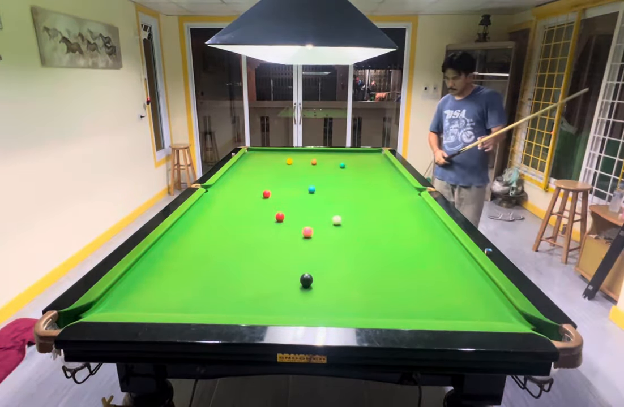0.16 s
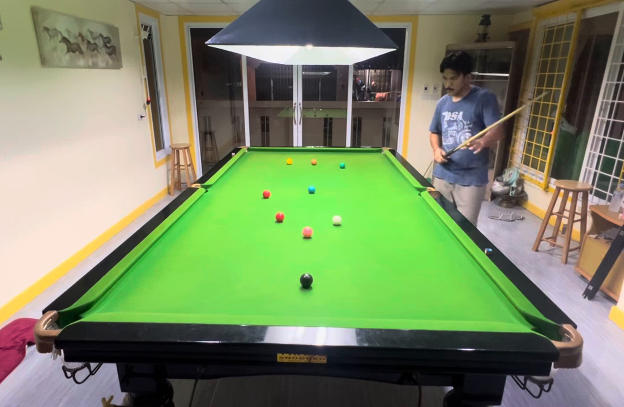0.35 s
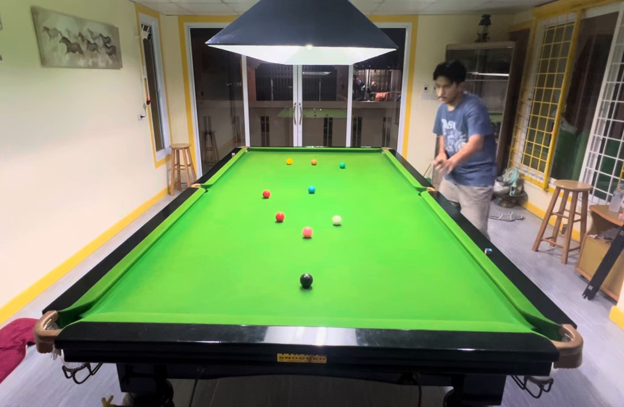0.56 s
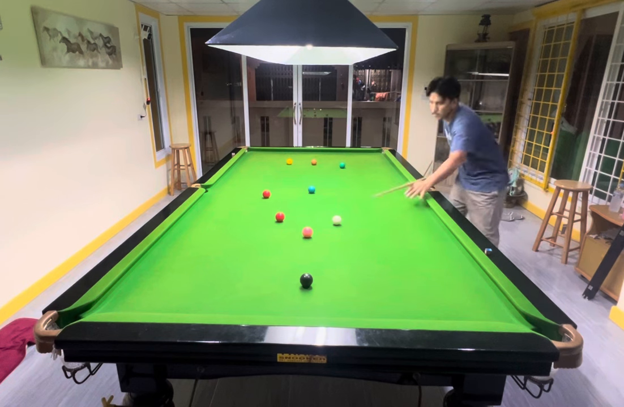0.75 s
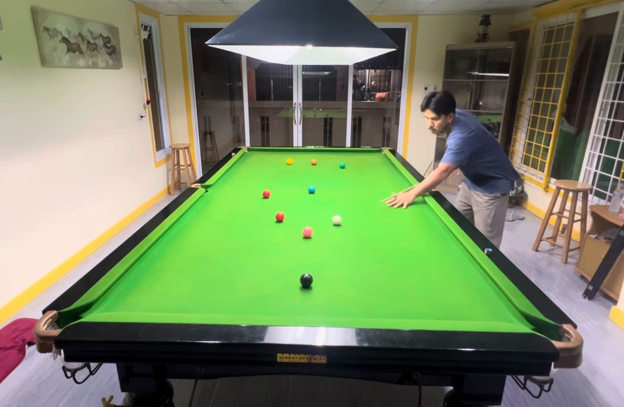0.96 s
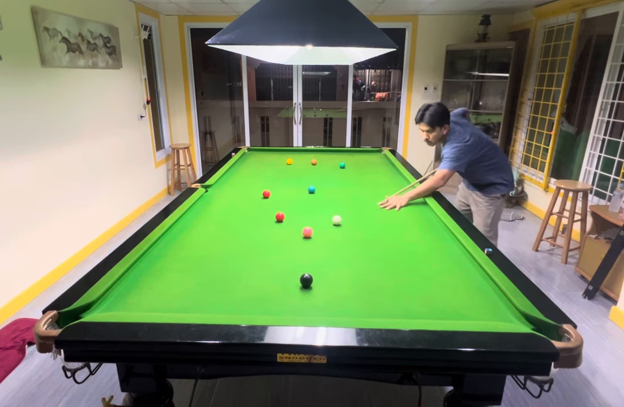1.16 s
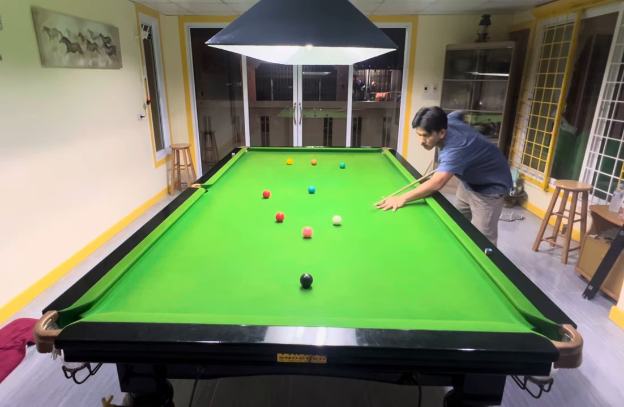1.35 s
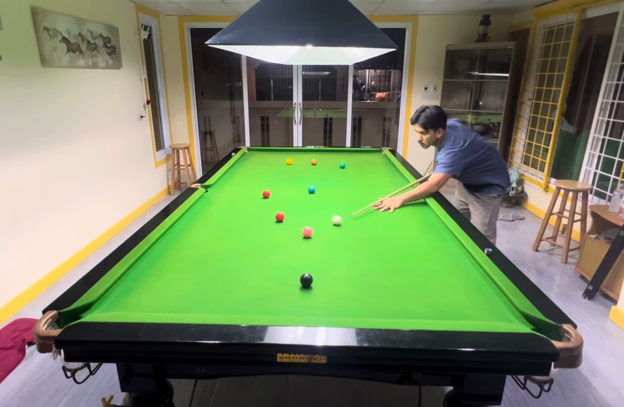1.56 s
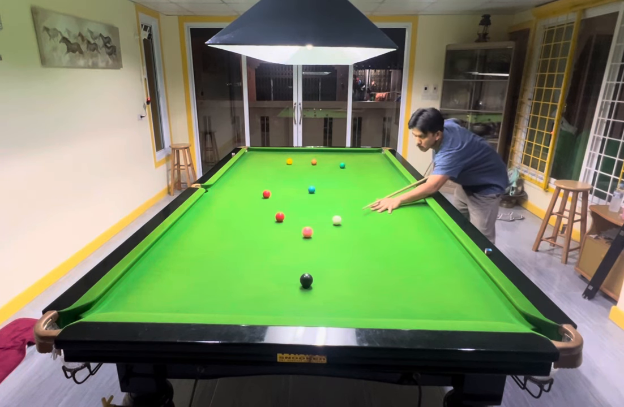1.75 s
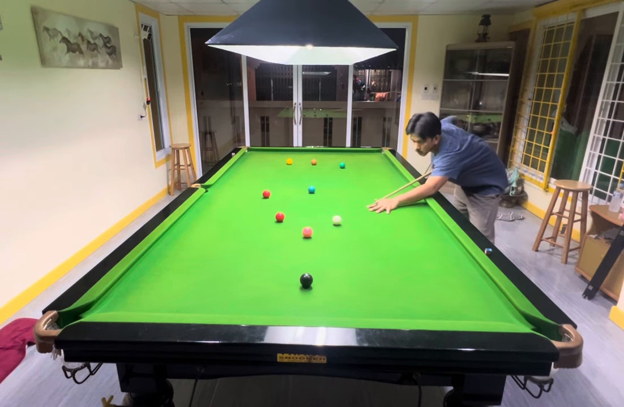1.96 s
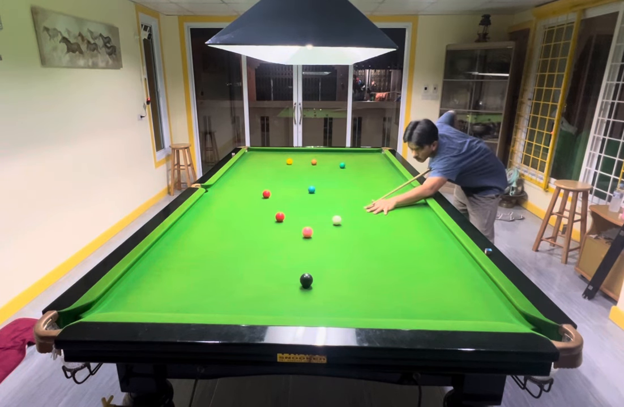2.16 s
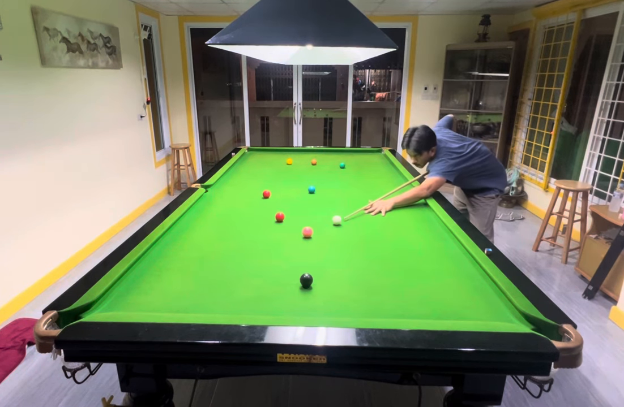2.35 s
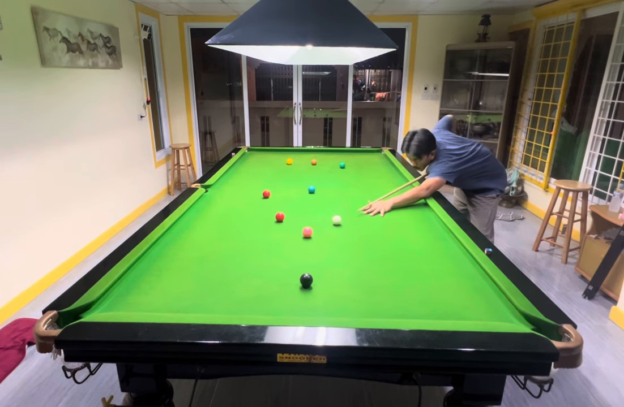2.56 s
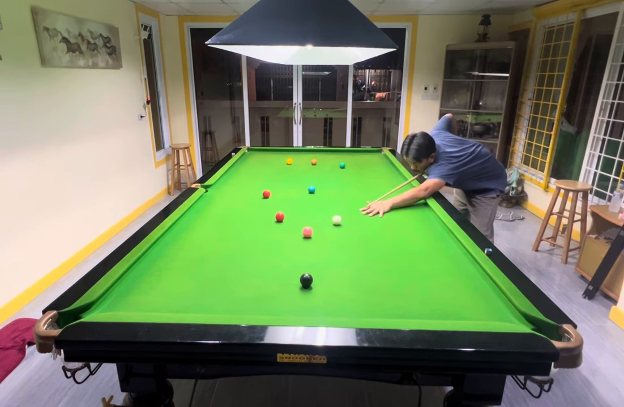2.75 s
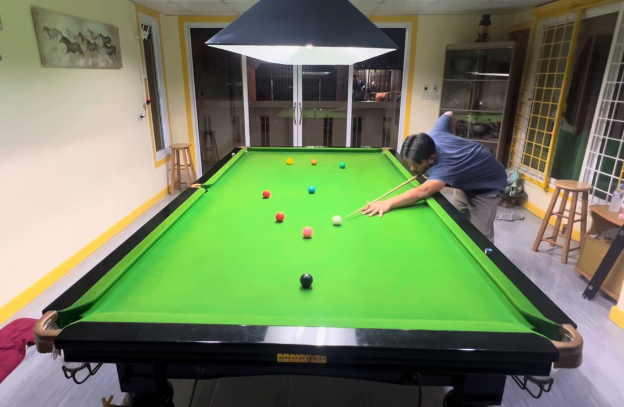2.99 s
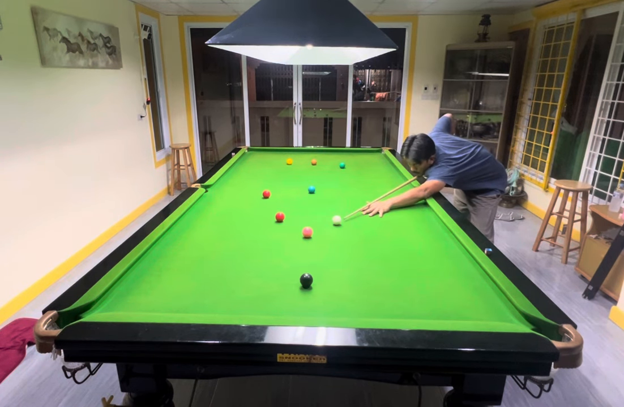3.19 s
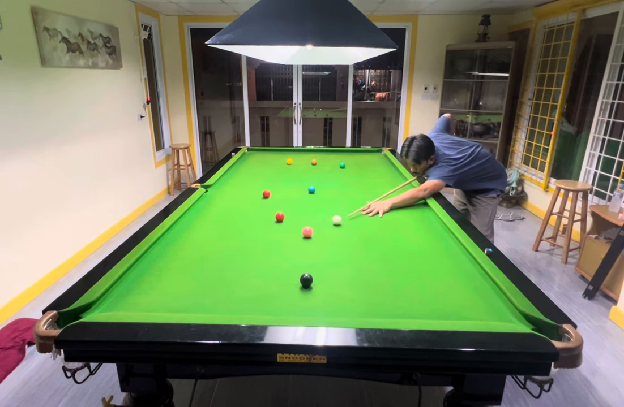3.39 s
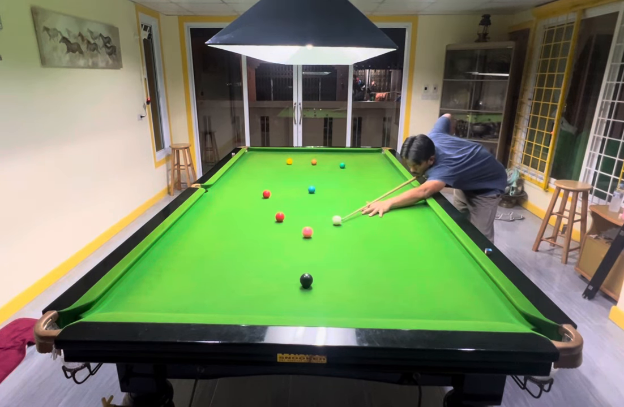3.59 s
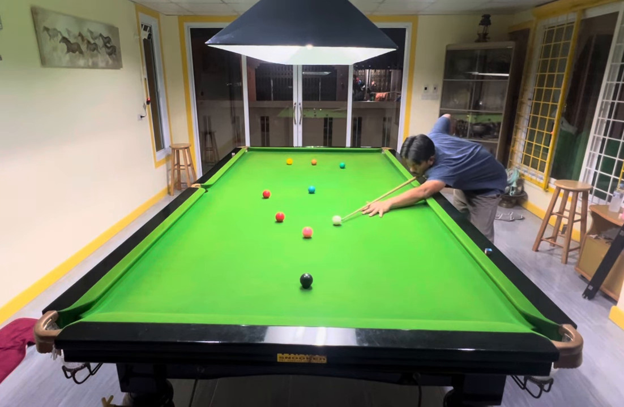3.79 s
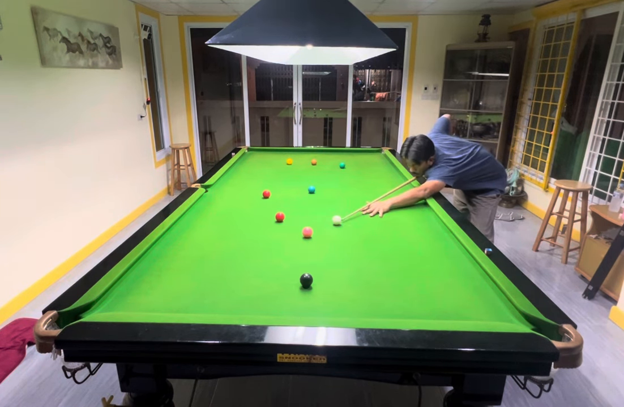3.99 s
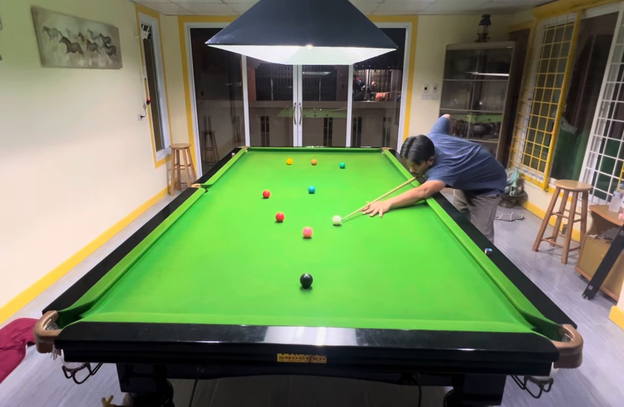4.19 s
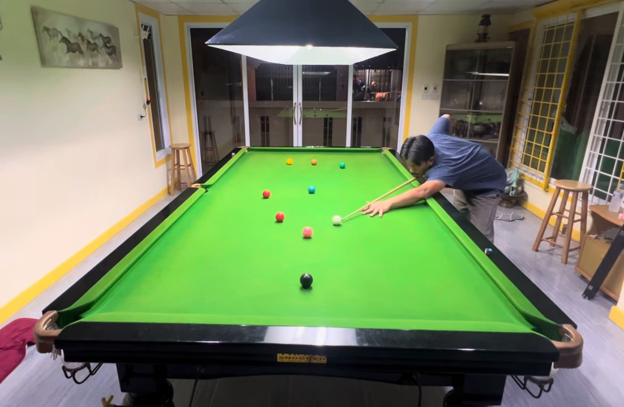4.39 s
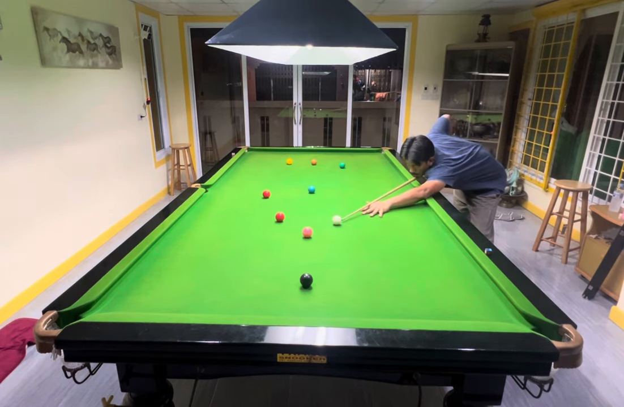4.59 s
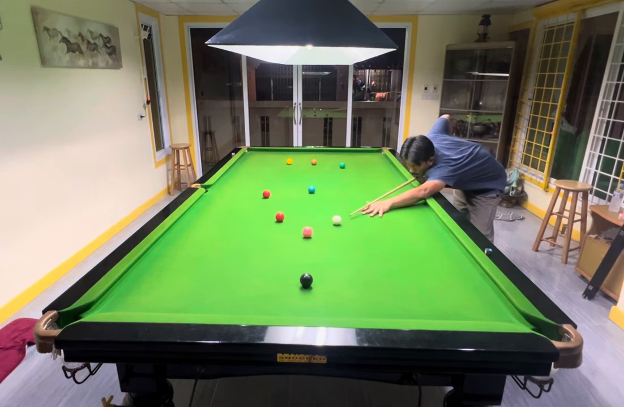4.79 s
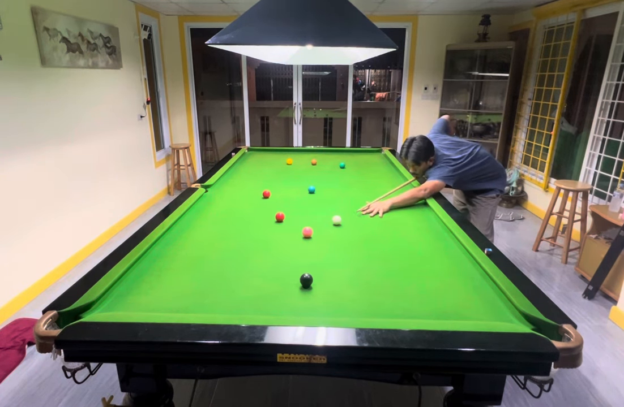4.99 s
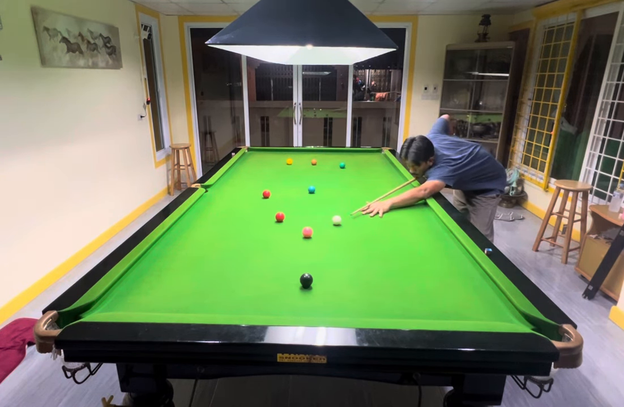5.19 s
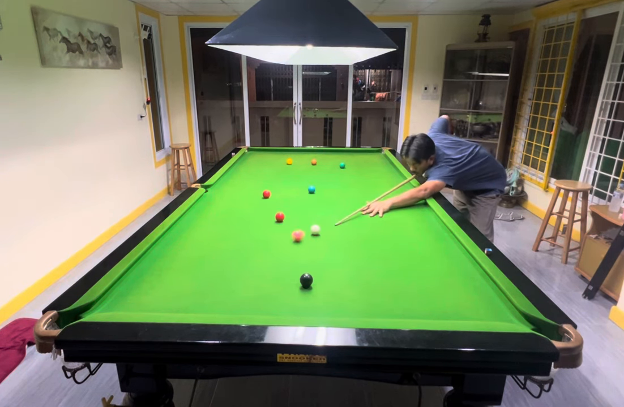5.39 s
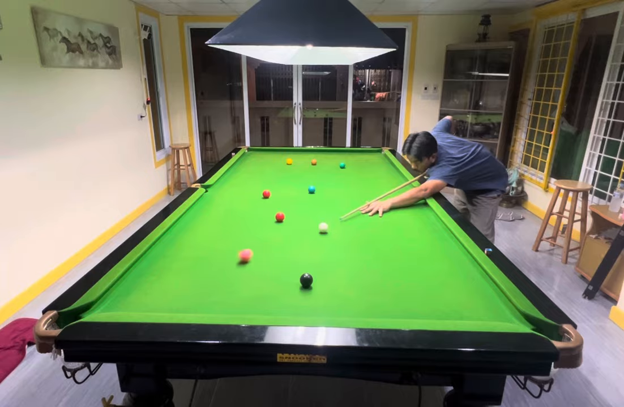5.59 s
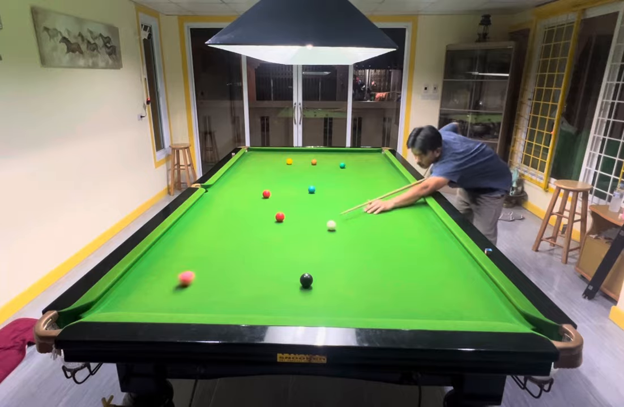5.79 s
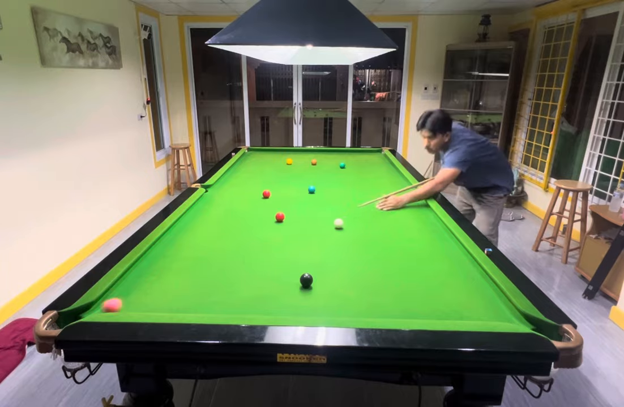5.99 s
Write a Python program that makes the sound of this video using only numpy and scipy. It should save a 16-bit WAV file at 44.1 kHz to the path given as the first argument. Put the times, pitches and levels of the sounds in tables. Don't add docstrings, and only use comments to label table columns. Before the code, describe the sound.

Steady low air conditioner hum with slight beating, airy hiss from the right and soft fan-blade ticks. Early on, quiet cloth rustles and one faint hand knock come from a player by the snooker table. Near the end the leather cue tip taps the ball, wood ringing briefly, and a tenth of a second later balls collide with a piercing crack. The reverberant room rings for under a second while a ball's faint cloth-rubbing roll approaches.

```python
import sys
import numpy as np
from scipy import signal
from scipy.fft import rfft, irfft, next_fast_len
from scipy.io import wavfile
from scipy.ndimage import map_coordinates

SR = 44100
rng = np.random.default_rng(int(sys.argv[2]) if len(sys.argv) > 2 else 0)


def inscribe(sig):
    pcm = np.round(np.clip(np.atleast_2d(sig).T, -1, 1) * 32767)
    wavfile.write(sys.argv[1], SR, pcm.astype(np.int16))


def to_linear_factor(level_db):
    exponent = np.asarray(level_db, float) / 20
    return 10 ** exponent


N = 266584

# t/s, contact pulse f/Hz, peak level/dB, left-right/dB, right side lag/s
BALL_HIT = (5.35862, 2840, -2.1, 1, .00006)
# t/s, contact pulse f/Hz, peak level/dB, left-right/dB, right side lag/s
CUE_HIT = (5.26947, 960, -20.5, -2.5, .00003)


def at_hz(points, hz, column=1):
    points = np.array(points)
    return np.interp(np.log(hz + 1), np.log(points[:, 0]), points[:, column])


def panned(pan_db):
    return to_linear_factor(np.multiply.outer([.5, -.5], pan_db))


def coloured(spectrum, size):
    hz = np.fft.rfftfreq(size, 1 / SR)
    white = rfft(rng.standard_normal((2, size)))
    return white * to_linear_factor(at_hz(spectrum, hz)) * np.sqrt(SR / 2), hz


def paired(noise, alike):
    alike = np.clip(alike, -1, 1)
    shared = np.sqrt(1 + alike) * noise[0]
    opposed = np.sqrt(1 - alike) * noise[1] * [[1], [-1]]
    return (shared + opposed) / np.sqrt(2)


def drift(rate):
    knots = rng.standard_normal(400)
    return map_coordinates(knots, [np.arange(N) / SR * rate * 2 + 2], order=3)


def ring(clicks, hz, t60):
    r, w = to_linear_factor(-60 / (t60 * SR)), 2 * np.pi * hz / SR
    return signal.lfilter([0, np.sin(w)], [1, -2 * r * np.cos(w), r * r], clicks + 1e-18)


def friction(strength, colour):
    noise = irfft(coloured(colour, size=N)[0], N)
    return noise / noise.std() * strength * to_linear_factor(1.0 * drift(4.6))


def contact(at_s, hz, peak_db, pan_db, lag_s):
    out, start = np.zeros((2, N)), int(at_s * SR) - 200
    t = (start + np.arange(400)) / SR
    cycles = hz * (t - at_s - np.array([[0], [lag_s]]))
    dip = np.cos(2 * np.pi * cycles) * np.exp(-(cycles / .68) ** 2)
    out[:, start:start + 400] = -to_linear_factor(peak_db) * panned(pan_db)[:, None] * dip
    return out


def tail(at_s, spectrum, build_s):
    # f/Hz, t60/s
    room_t60 = [(200, 0.67), (400, 0.35), (700, 0.57), (1400, 0.71), (2700, 0.74), (4000, 0.62),
                (7500, 0.62), (10500, 0.3), (14500, 0.35)]
    # f/Hz, correlation/1
    tail_likeness = [(150, .9), (300, 0.57), (500, -0.32), (1000, -0.27), (2500, -0.026)]
    start = int(at_s * SR)
    t = np.arange(N - start) / SR
    noise, hz = coloured(spectrum, size=len(t))
    noise = paired(noise, at_hz(tail_likeness, hz))
    out = np.zeros((2, N))
    for centre in 90 * 2 ** np.arange(0, 8, .5):
        share = np.clip(1 - 2 * abs(np.log2((hz + 1) / centre)), 0, 1)
        decay = to_linear_factor(-60 * t / at_hz(room_t60, centre))
        out[:, start:] += irfft(noise * share, len(t)) * decay
    out[:, start:] *= np.sqrt(2) * (1 - np.exp(-t / build_s))
    return out


def blow(hit, spectrum, echo_db, build_s):
    # delay/s, level/dB, left-right/dB, right side lag/s
    echoes = [(.0018, -17, 6, .0002), (.0033, -17, 6, .0001), (.0078, -2, 0, .00045), (.0093, -6, 4, .0003),
              (.0122, -10, -4, .0001), (.0157, -12, 2, .0008), (.0195, -10, -5, .0001),
              (.0224, -8, 1, .0001), (.0232, -9, 0, 0), (.0254, -8, 0, .0001), (.0350, -11, -2, .0001)]
    at_s, hz, peak_db, pan_db, lag_s = hit
    out = contact(*hit) + tail(at_s, spectrum, build_s)
    for delay, loss_db, side_db, late_s in echoes:
        out += contact(at_s + delay, hz, peak_db + loss_db + echo_db, side_db, late_s)
    return out


def ball_crack():
    # f/Hz, level/dB per Hz
    ball_tail = [(150, -83), (400, -69.5), (650, -67), (1150, -58), (1700, -54.5), (2200, -54), (2700, -54),
                 (3600, -61), (5000, -74), (6200, -93), (8600, -90.5), (10800, -100), (12200, -118),
                 (14800, -100)]
    return blow(BALL_HIT, ball_tail, echo_db=.5, build_s=.014)


def cue_knock():
    # f/Hz, level/dB per Hz
    cue_tail = [(150, -76), (380, -58.5), (620, -65.5), (900, -59.5), (1300, -60.5), (2300, -62),
                (3100, -66.5), (4400, -71.5), (5500, -82.5), (7500, -85), (8600, -92), (12400, -107),
                (13600, -104), (15700, -93)]
    return blow(CUE_HIT, cue_tail, echo_db=0, build_s=0.0075)


def roll():
    # f/Hz, level/dB
    roll_colour = [(1500, -4), (3600, -0.5), (4400, 2), (6200, -2.5), (7500, -7), (8600, 3.5), (10000, -7),
                   (11000, -17), (12500, -29), (15400, -22), (16100, -39)]
    speed_m_s, nearest_s, nearest_m = 2.4, 5.98, 0.42
    shading = 2.4
    t = np.arange(N) / SR
    far = np.hypot(1, speed_m_s * (t - nearest_s) / nearest_m)
    return friction(to_linear_factor(-60.5) * far ** -shading * (t > BALL_HIT[0]), roll_colour)


def wood():
    # f/Hz, level/dB, t60/s
    cue_modes = [(270, -7.5, .15), (569, 0, 0.08), (862, -8, 0.16), (988, -3, 0.38), (1377, -9, .2),
                 (1615, 3, 0.18), (2140, 0, 0.27), (2476, 0, 0.16), (2980, -10, .15)]
    # t/s, f/Hz, level/dB, t60/s
    hand_knock = (1.108, 700, -53, .35)
    tip_hz = 3000
    click = np.arange(N) == int((CUE_HIT[0] + .0001) * SR)
    click = signal.sosfilt(signal.butter(2, tip_hz, fs=SR, output="sos"), click + 1e-18)
    cue = sum(to_linear_factor(level_db - 33) * ring(click, hz, t60) for hz, level_db, t60 in cue_modes)
    at_s, hz, level_db, t60 = hand_knock
    hand = to_linear_factor(level_db) * ring(np.arange(N) == int(at_s * SR), hz, t60)
    return np.outer(panned(-1.5), cue) + np.outer(panned(-5), hand)


def rustle():
    # f/Hz, level/dB
    rustle_colour = [(1500, -17.5), (2300, 5.5), (3600, 3), (4400, -1), (6200, -1.5), (7500, -15),
                     (8600, 1), (10000, -8), (11000, -17), (12800, -38), (13400, -37)]
    # t/s, peak level/dB, length/s
    moves = [
        (.38, -73, .1),
        (0.684, -67, .2),
        (1.05, -70.5, 0.21),
        (1.43, -68, 0.19),
        (2.0, -72, 0.54),
        (2.7, -80, .5),
    ]
    edge_db_per_s = 77.5
    t = np.arange(N) / SR
    strength = 0
    for s, peak_db, lasts in moves:
        outside_s = np.maximum(abs(t - s) - lasts / 2, 0)
        strength = strength + to_linear_factor(peak_db - edge_db_per_s * outside_s)
    return friction(strength, rustle_colour)


def fan_ticks():
    # f/Hz, level/dB, t60/s, left-right/dB, response to lean/(dB per dB)
    housing = [(730, -5, 0.046, -8, 0.7), (1195, -7.5, 0.076, 0, -0.9), (1330, -9, 0.13, 0, -1.2),
               (1416, -6, 0.092, 1, -0.2), (1462, -0.5, 0.063, 2, 0.68), (1600, -14, .07, 8, -0.2),
               (1940, -17, 0.064, -1, -6), (2083, -15.5, 0.2, -4, 0.5), (2430, -15, 0.12, -5, 0.25),
               (2870, -20.5, 0.052, 18, -0.7)]
    # t/s, rubbing/s, level/dB, fade/dB per turn
    catches = [(.1168, .32, -50, 2), (0.5448, .32, -48, 1.9), (.9729, .32, -49.5, 4.5),
               (1.4009, .11, -51, 8), (1.722, .11, -55, 0), (2.364, .11, -58.5, 1),
               (3.1126, .11, -61, -1.1), (3.3271, .32, -53, 2), (3.7551, .32, -53, 0.7),
               (4.2103, 0, -54.5, 0), (4.3972, 0, -51.5, 0), (4.6112, 0, -53.5, 0), (4.8252, 0, -54.5, 0),
               (5.0393, 0, -53, -1), (5.8953, .11, -62, 2)]
    turn_s, rebound_s = .10701, .0085
    touches = []
    for s, lasts, level_db, fade_db in catches:
        for k in range(round(lasts / turn_s) + 1):
            touches.append((s + k * turn_s, level_db - k * fade_db))
    s, level_db = np.transpose(touches)
    lean_db = -1 + 1.25 * s
    at, out = (s * SR).astype(int), np.zeros((2, N))
    chance = rng.standard_normal((len(at), len(housing)))
    swell = np.exp(-1 / (0.00086 * SR))
    for (hz, mode_db, t60, pan_db, lean), luck in zip(housing, chance.T):
        clicks = np.zeros(N)
        clicks[at] = to_linear_factor(level_db + mode_db + 4 + lean * lean_db + 1.5 * luck)
        clicks += to_linear_factor(-4) * np.roll(clicks, round(rebound_s * SR))
        w = 2 * np.pi * hz / SR
        top, bottom = [1 - swell ** 2, 0, swell ** 2 - 1], [2, -4 * swell * np.cos(w), 2 * swell ** 2]
        ringing = signal.lfilter(top, bottom, ring(clicks, hz, t60))
        out += np.outer(panned(pan_db), ringing)
    return out


def hum():
    # shaft order/1, magnetic order/1, rms level/dB, left-right/dB
    hum_lines = [(1, 0, -60, -3), (2, 0, -49.5, -1), (0, 1, -62, 4), (3, 0, -60.5, 1.5), (1, 1, -51, -4),
                 (4, 0, -60.5, -4.5), (2, 1, -95, 8)]
    shaft_hz, shaft_angle = 48.293, 0.093
    magnet_hz, magnet_angle = 100.05, -0.49
    lag_s = 0.0003
    t, out = np.arange(N) / SR + np.array([[-.5], [.5]]) * lag_s, 0
    for shaft, magnet, level_db, pan_db in hum_lines:
        angle = round(shaft) * (2 * np.pi * shaft_hz * t + shaft_angle)
        angle = angle + round(magnet) * (2 * np.pi * magnet_hz * t + magnet_angle)
        height = np.sqrt(2) * to_linear_factor(level_db + 0.16 * drift(1.5))
        out = out + height * panned(pan_db)[:, None] * np.cos(angle)
    return out


def whine():
    # f/Hz, rms level/dB
    tones = [(2751, -90), (2837, -88.5), (2891, -85), (2972, -96), (3047, -86), (4414, -94), (6675, -94),
             (7440, -96)]
    hz, level_db = np.transpose(tones)[:, :, None]
    return np.sqrt(2) * (to_linear_factor(level_db) * np.sin(2 * np.pi * hz * np.arange(N) / SR)).sum(axis=0)


def air():
    # f/Hz, level/dB per Hz
    blown = [(22, -103), (35, -90), (44, -79), (75, -79), (125, -82), (230, -80), (400, -84.5),
             (550, -89.5), (720, -89.5), (1100, -90.5), (1350, -91.5), (1600, -89), (1900, -93.5),
             (2700, -102),
             (3100, -103), (3700, -107.5), (4450, -104), (4950, -113), (5500, -109), (7150, -112),
              (7500, -106), (7950, -113), (8600, -112), (9900, -128), (10400, -131), (11500, -129),
              (12900, -138), (13400, -150)]
    # f/Hz, left-right likeness/1, left-right/dB
    air_space = [(60, 1, -1), (154, 0.83, 3.5), (260, 0.81, -0.5), (400, 0.43, -3), (640, 0.39, -3),
                 (1090, 0.11, 1.5), (1380, 0.26, 2), (1594, 0.11, 11.5), (1890, 0.17, 5.5), (3060, 0.14, 0),
                 (5460, 0.057, 1.5), (9600, 0.099, 6.5)]
    # f/Hz, lag/s
    air_lag = [(120, 0.00022), (300, 0.0006), (550, 0.00086), (1000, .0011), (3000, 0.000755)]
    noise, hz = coloured(blown, size=N)
    pair = np.sqrt(2) * paired(noise, at_hz(air_space, hz))
    pair[0] *= np.exp(-2j * np.pi * hz * at_hz(air_lag, hz))
    return irfft(pair * panned(at_hz(air_space, hz, column=2)), N) * to_linear_factor(0.66 * drift(4.8))


def scene():
    shot = ball_crack() + cue_knock() + wood() + roll()
    conditioner = fan_ticks() + hum() + whine() + air()
    return shot + rustle() + conditioner


def top_cut(x):
    return signal.sosfilt(signal.butter(12, 15800, fs=SR, output="sos"), x)


def record(dry):
    # f/Hz, left-right/dB
    port_balance = [(2500, 0.5), (3800, 2.5), (4400, 3.5), (5500, 8), (6900, 8.5), (8000, 3), (8600, 2),
                    (9200, -4), (10000, -2), (11500, -12)]
    mono_hz, mono_top_hz, top_hz = 11500, 13000, 15800
    size = next_fast_len(N)
    hz = np.fft.rfftfreq(size, 1 / SR)
    ports = rfft(dry, size) * panned(at_hz(port_balance, hz))
    mono = (hz > mono_hz) & (hz < mono_top_hz)
    ports[:, mono] = ports[:, mono].sum(axis=0) / np.sqrt(2)
    ports[:, hz > top_hz] = 0
    return top_cut(irfft(ports, size)[:, :N])


dry = scene()
out = record(dry)
inscribe(out)
```